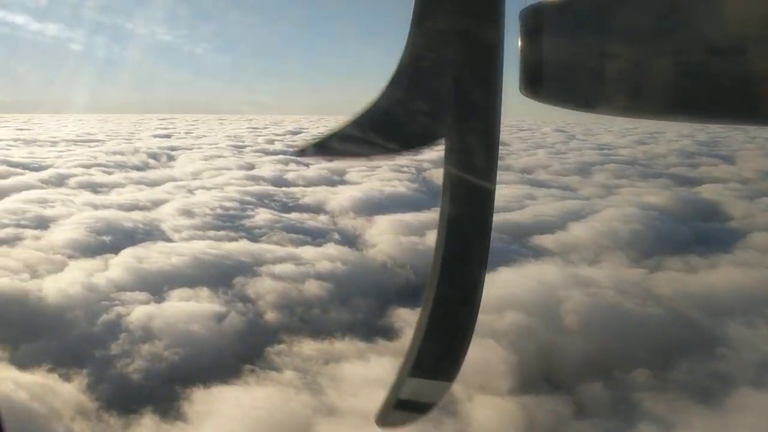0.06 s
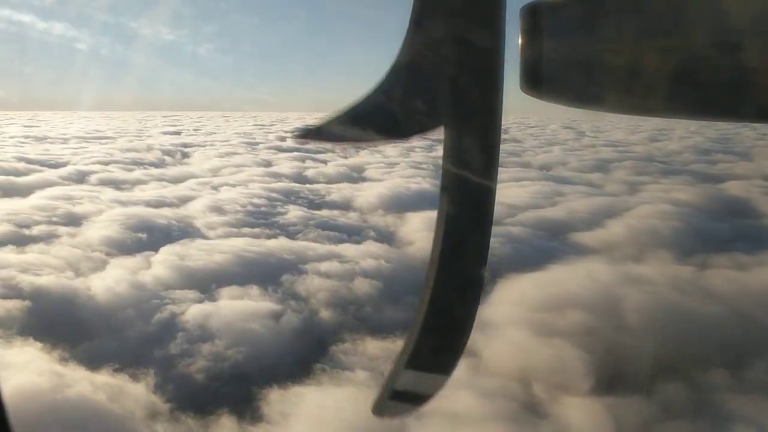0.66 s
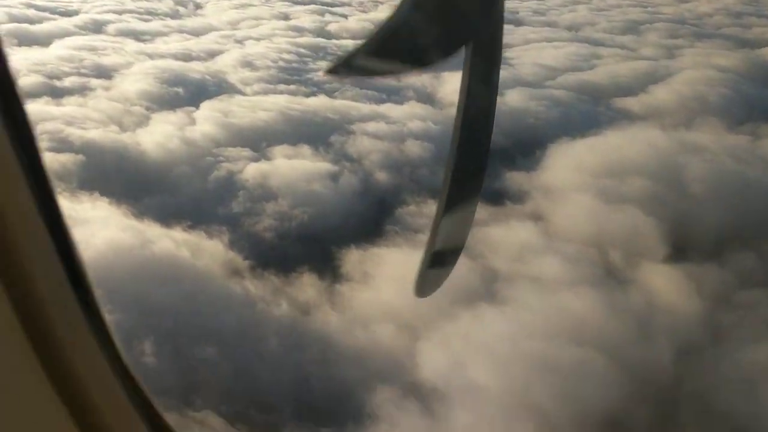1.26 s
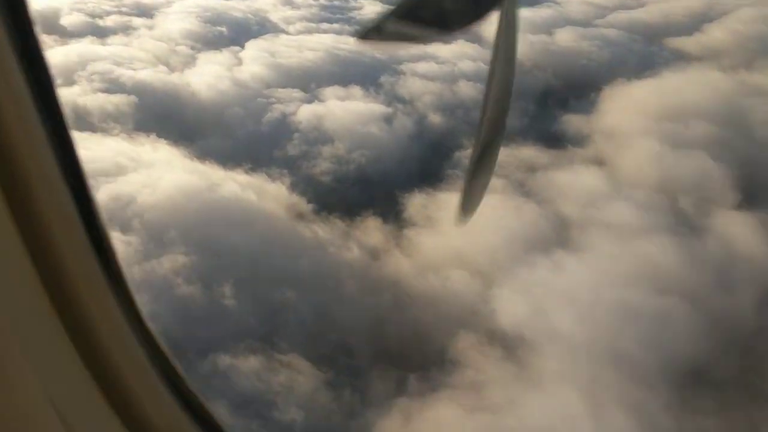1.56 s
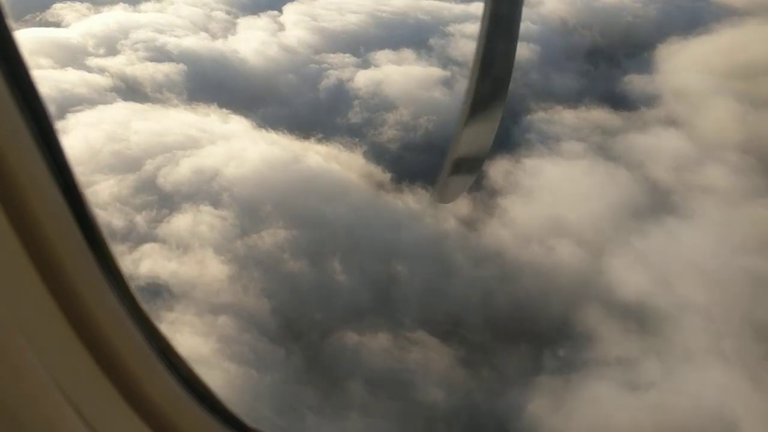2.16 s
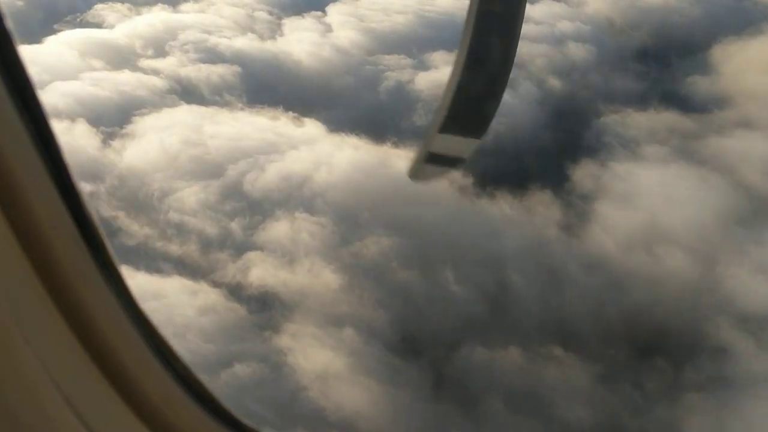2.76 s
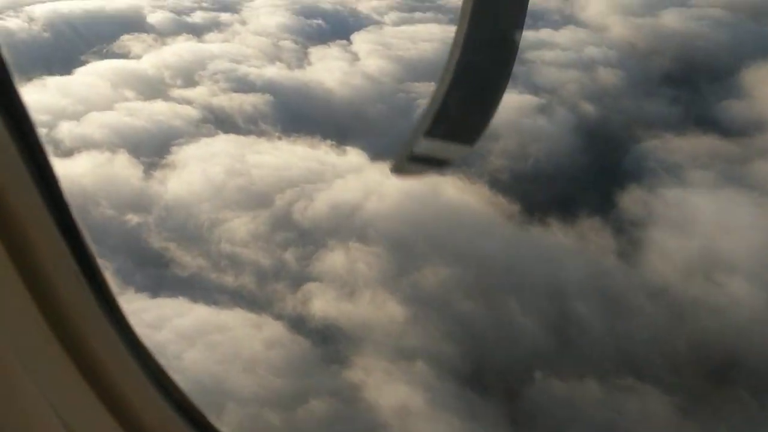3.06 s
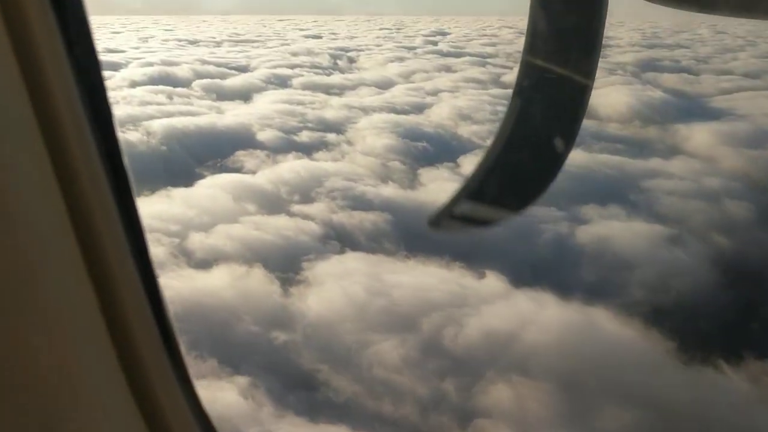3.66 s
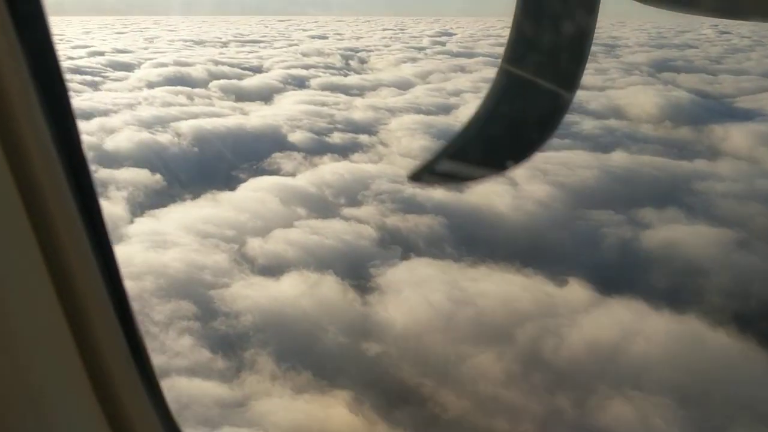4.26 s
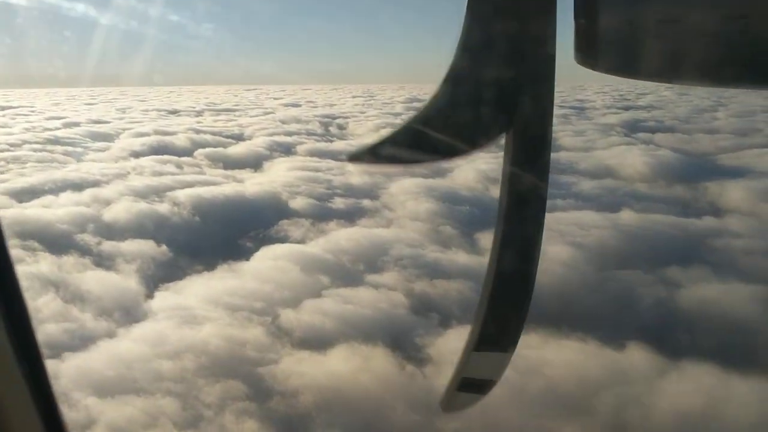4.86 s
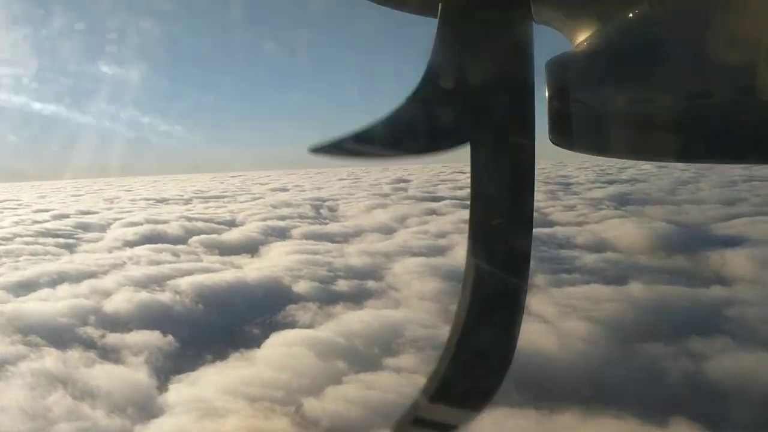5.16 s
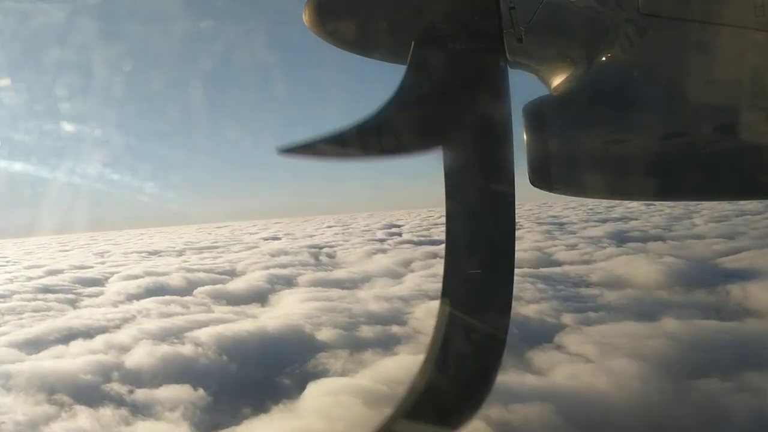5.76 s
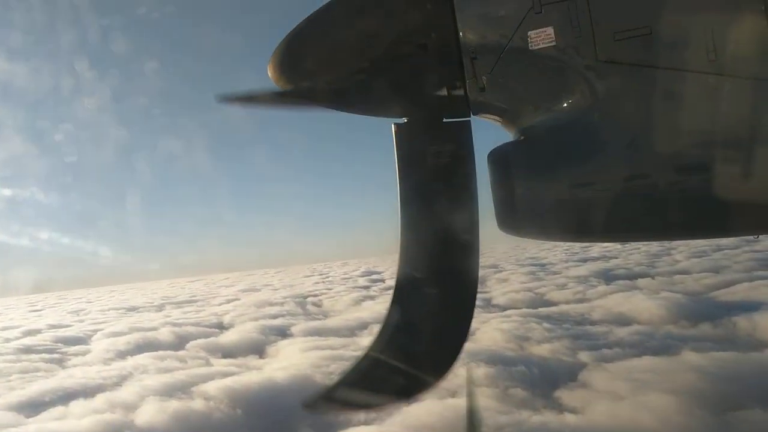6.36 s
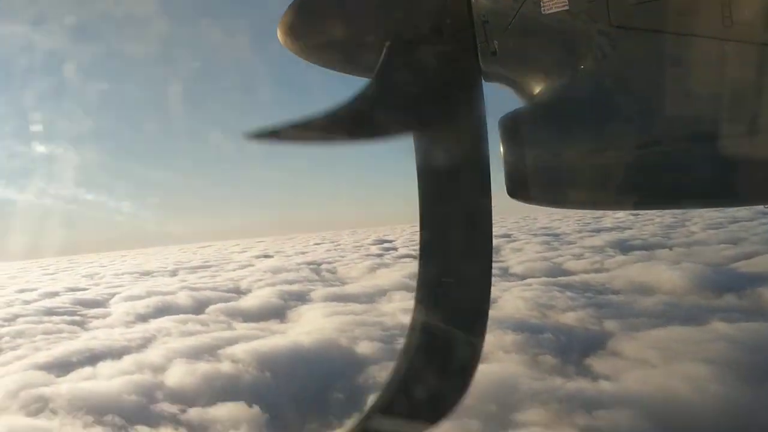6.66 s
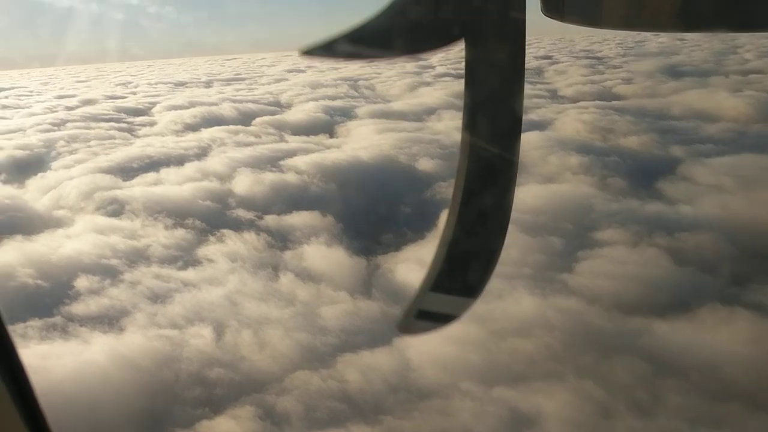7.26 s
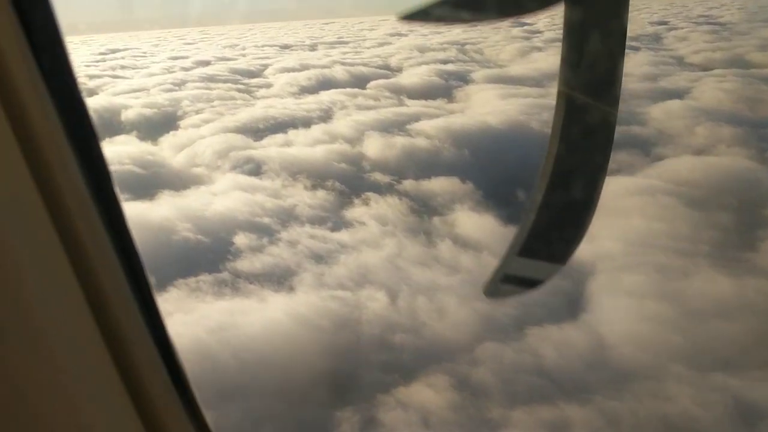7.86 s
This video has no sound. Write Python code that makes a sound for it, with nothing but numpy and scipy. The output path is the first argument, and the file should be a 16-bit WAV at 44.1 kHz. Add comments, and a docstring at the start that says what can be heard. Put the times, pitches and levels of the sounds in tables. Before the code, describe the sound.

Two propellers drone deeply and without a break inside an airliner cabin, heard from a window seat beside the near engine. Their held tones slowly swell and thin against each other over a steady low roar and soft hiss of air. Close by, the loose window pane buzzes faintly and its trim chatters, a little more from about one second in, easing in the second half. A thin gear whine sits far behind.

```python
"""Two propellers drone at about 60 Hz and its multiples, heard inside a turboprop airliner in cruise.
The microphone is at a window seat beside the near propeller. The harmonics swell and thin as the far
propeller slips ahead of the near one and falls back. The slipstream roars on the fuselage; close by,
the drone makes the loose inner window pane buzz and its trim chatter. Behind it all the gears whine."""
import sys
import numpy as np
from scipy import signal
from scipy.fft import rfft, irfft, next_fast_len
from scipy.io import wavfile
from scipy.ndimage import map_coordinates

SR = 44100
rng = np.random.default_rng(int(sys.argv[2]) if len(sys.argv) > 2 else 0)


def store_wav(level_fs):
    """Save 16-bit WAV to argv[1]."""
    pcm = np.round(np.clip(np.atleast_2d(level_fs), -1, 1) * 32767)
    wavfile.write(sys.argv[1], SR, pcm.T.astype(np.int16))


N = 348831
BLADE_HZ, TOP_HZ = 60.2, 15750


def propellers(passes):
    """Both propellers beat on the fuselage; each strong order adds or cancels with the far one's lead."""
    # Strong harmonics at the seat. Each row: blade order, near propeller in dB, far propeller in dB,
    # lead in blade passes at which they cancel most.
    drone = [(1, -17.5, -27.6, .216), (2, -31.6, -28.2, .38), (3, -33.2, -40.7, .12),
             (4, -38.2, -49.5, .245), (5, -43.5, -55, .236)]
    # Weaker blade harmonics. Each row: blade order, level in dB.
    overtones = [(7, -56), (8, -61), (9, -61), (10, -66), (11, -66), (12, -64), (14, -72), (21, -73),
                 (22, -74), (23, -72), (24, -72), (40, -85), (41, -85), (42, -86)]
    # The far propeller's lead over the near one. Each row: time in seconds, lead in blade passes.
    slip = [(0, .01), (.5, .045), (1.3, .085), (2.1, .185), (2.8, .245), (3.2, .27), (3.65, .375),
            (4.15, .38), (4.6, .29), (5.2, .195), (5.9, .13), (6.5, .07), (7, .145), (7.9, 0)]
    shake_db_per_order = .2  # uneven inflow shakes the high orders most
    out = np.zeros(N)
    lead, = curves(slip)
    shaken = passes + 0.0029 * wobble(9)
    for order, near_db, far_db, cancel in drone:
        near = amp(near_db) * tone(order * shaken)
        far = amp(far_db) * tone(order * (shaken + lead - cancel))
        out += amp(shake_db_per_order * order * wobble(4)) * (near - far)
    for order, db in overtones:
        phase_drift = rng.random() + .1 * wobble(1.5)
        out += amp(db + 3.2 * wobble(3.02)) * tone(order * shaken + phase_drift)
    return out


def slipstream():
    """Turbulent air drums on the cabin wall, rings its panels and hisses past the window."""
    # Air heard through the wall (roar), through the window (rush), and along the window and from
    # the vents (hiss). Each row: frequency in Hz, noise density in dB.
    roar_spectrum = [(20, -72.5), (36, -72.5), (52, -57.5), (68, -43), (76, -46), (88, -53.5), (110, -47.5),
                     (160, -50.5), (210, -56), (255, -59), (350, -62), (500, -71.5), (900, -88.5),
                     (3000, -140)]
    rush_spectrum = [(300, -90), (560, -70), (750, -75.5), (1000, -81), (1300, -84.5), (2000, -105),
                     (4000, -140)]
    hiss_spectrum = [(700, -115), (1350, -86), (1800, -91.5), (2500, -93.2), (3700, -99), (4900, -101),
                     (5700, -102), (6400, -102.5), (7300, -108.5), (8400, -109.5), (9200, -113.5),
                     (11500, -114), (15500, -120)]
    # Wall panel resonances. Each row: frequency in Hz, width in Hz, peak in dB.
    panel_modes = [(286, 35, -56), (325, 30, -62), (412, 40, -62.5), (1480, 60, -80.7), (6150, 200, -101)]
    # Swell of the airflow. Each row: time in seconds, then roar, rush and hiss gains in dB.
    airflow = [(0.3, -1.5, -1.5, -1.8), (1.4, -1.1, -0.6, 0), (3.1, .3, .5, 1.2), (4.4, .2, -1.5, .8),
               (5.6, 1.2, 1.6, .2), (6.2, .3, 2, -.6), (7.6, 1, -1, -1.6)]
    roar_db, rush_db, hiss_db = curves(airflow)
    roar = filtered(white(), slope(roar_spectrum)) * amp(roar_db + 0.24 * wobble(4.6))
    panels = filtered(white(), resonances(panel_modes)) * amp(roar_db + 1.1 * wobble(4))
    rush = filtered(white(), slope(rush_spectrum)) * amp(rush_db + 0.48 * wobble(3.6))
    hiss = filtered(white(), slope(hiss_spectrum)) * amp(hiss_db + 0.35 * wobble(5.6))
    return roar + panels + rush + hiss


def window(passes):
    """Close to the microphone, the drone shakes the inner pane into a buzz and its trim into chatter."""
    # Modes of the pane and of the trim. Each row: frequency in Hz, width in Hz, peak in dB.
    pane_modes = [(1488, 40, -83), (1992, 34, -81.5), (5411, 45, -96.5)]
    trim_modes = [(4565, 80, -95), (6980, 80, -108), (7610, 60, -105), (8480, 200, -113), (9740, 50, -111),
                  (10780, 45, -101), (11600, 130, -106), (11980, 35, -106), (13790, 60, -109),
                  (15400, 130, -110)]
    # Dry tick of the trim's contacts. Each row: frequency in Hz, level in dB.
    tick_spectrum = [(1000, -127), (3500, -112), (7000, -117.5), (11000, -120), (16000, -124)]
    # How hard the window rattles. Each row: time in seconds, pane gain in dB, trim gain in dB.
    rattle = [(.85, -6, -6), (1.3, 1.3, .5), (1.9, 1.8, .2), (2.4, 2.5, 3.4), (3.3, 4, 3.4), (4.3, 1.8, 0),
              (5.2, -1, -1), (6.2, -6.5, -2.5), (7.6, -5.7, -5.3)]
    # Harder knocks of the trim. Each row: start in seconds, force in dB over a typical contact.
    knocks = [(1.08, 7), (1.41, 9), (1.565, 6), (2.437, 7), (4.53, 8), (4.72, 7)]
    pane_db, trim_db = curves(rattle)
    buzz = scuffs(contacts(passes, scatter_db=2), t60=.012) * amp(pane_db)
    blows = contacts(passes, scatter_db=2.6)
    for start, db in knocks:
        blows[round(start * SR)] += amp(db)
    chatter = scuffs(blows, t60=.018) * amp(trim_db + 0.8 * wobble(6))
    pane = filtered(buzz, resonances(pane_modes))
    trim = filtered(chatter, resonances(trim_modes))
    ticks = filtered(chatter, slope(tick_spectrum))
    return pane + trim + ticks


def contacts(passes, scatter_db):
    """A loose part hits its frame at both ends of each swing, one end harder, with scattered force."""
    half_swings = np.floor(2 * passes)
    hits = np.flatnonzero(np.diff(half_swings))
    soft_end = half_swings[hits] % 2
    # four blades make one turn of the shaft, whose unbalance rocks the part as well
    shaft = np.sin(np.pi * half_swings[hits] / 4)
    force_db = scatter_db * rng.standard_normal(len(hits)) - 4 * soft_end + 2 * shaft
    blows = np.zeros(N)
    blows[hits] = unit(amp(force_db))
    return blows


def scuffs(blows, t60):
    """Each contact is a short scrape: noise that dies by 60 dB in t60 seconds."""
    t = np.arange(SR // 20) / SR
    envelope = signal.fftconvolve(blows, amp(-60 * t / t60))[:N]
    return unit(envelope) * white()


def gears():
    """Far back in the sound, gears and turbine whine thinly, wavering in pitch and strength."""
    # The whining tones. Each row: frequency in Hz, level in dB.
    whines = [(6201, -86), (6141, -89), (6081, -91), (4170, -88), (7596, -95)]
    t = np.arange(N) / SR
    return sum(amp(db + 2.5 * wobble(4)) * tone(hz * t + 0.27 * wobble(9.4)) for hz, db in whines)


def amp(db):
    """Decibels to gain."""
    return 10 ** (np.asarray(db) / 20)


def unit(x):
    """x at rms 1."""
    return x / np.sqrt(np.mean(x ** 2) + 1e-20)


def tone(cycles):
    """A sine of rms 1."""
    return np.sqrt(2) * np.sin(2 * np.pi * cycles)


def white():
    """Noise of unit density per Hz."""
    return rng.standard_normal(N) * np.sqrt(SR / 2)


def curves(rows):
    """One value per sample for each column after the time."""
    times, *columns = np.transpose(rows)
    return [np.interp(np.arange(N) / SR, times, column) for column in columns]


def wobble(rate):
    """A smooth random curve, rate knots a second."""
    knots = rng.standard_normal(int(N * rate / SR) + 4)
    return map_coordinates(knots, [np.arange(N) * rate / SR], mode="mirror")


def filtered(x, response):
    """x through a complex frequency response."""
    size = next_fast_len(N + SR // 2)
    return irfft(rfft(x, size) * response(np.fft.rfftfreq(size, 1 / SR)), size)[:N]


def slope(points):
    """The response through (Hz, dB) points on a log axis."""
    hz, db = np.transpose(points)
    return lambda f: amp(np.interp(np.log(f + 1), np.log(hz + 1), db))


def resonances(modes):
    """The causal response of (Hz, width in Hz, dB) modes; above its peak each falls away like a mass."""
    return lambda f: sum(amp(db) * hz * width / (hz * hz - f * f + 1j * f * width)
                         for hz, width, db in modes)


def scene():
    """The cabin from the window seat; one blade rate drives both the drone and the rattling window."""
    passes = BLADE_HZ * np.arange(N) / SR
    return (propellers(passes) + slipstream() + gears() + window(passes))[None]


def record(dry):
    """One microphone at the seat, with nothing above TOP_HZ."""
    return filtered(dry[0], lambda hz: hz < TOP_HZ)[None]


dry = scene()
out = record(dry)
store_wav(out)
```